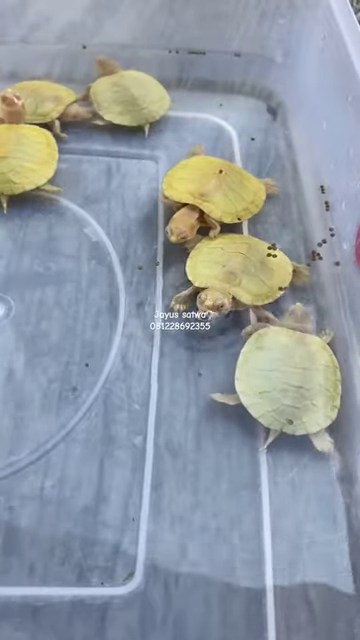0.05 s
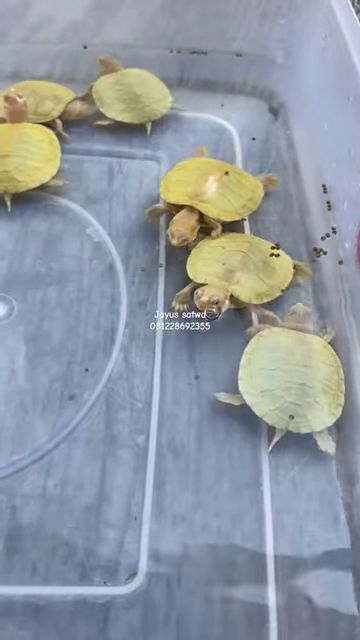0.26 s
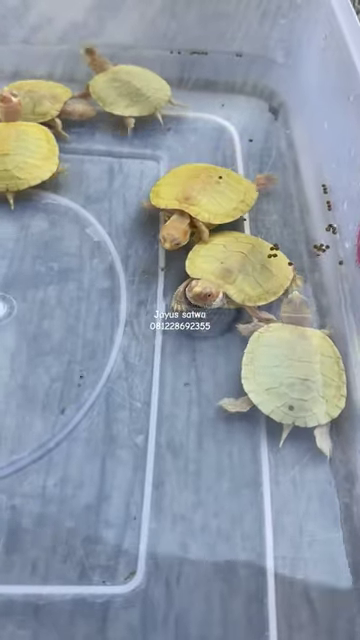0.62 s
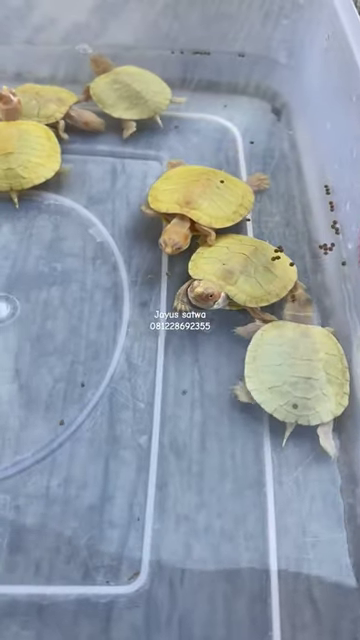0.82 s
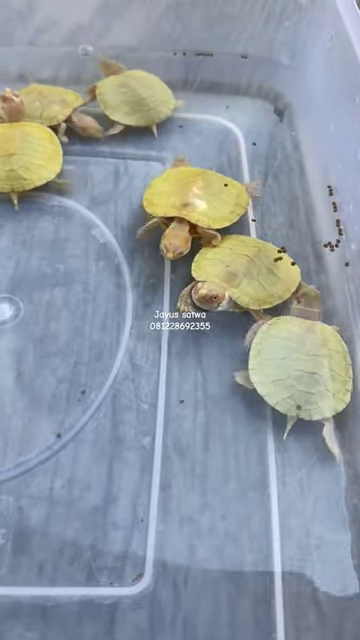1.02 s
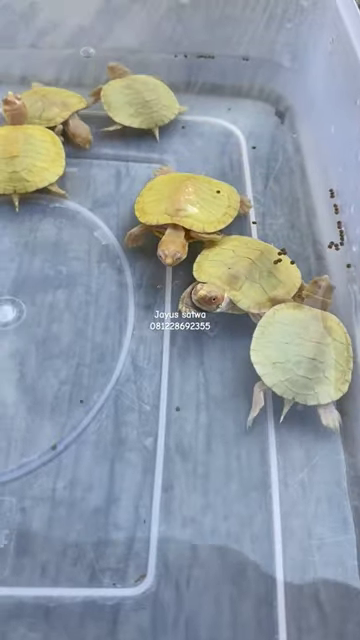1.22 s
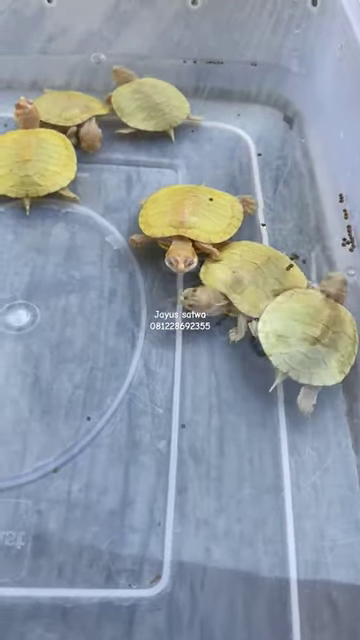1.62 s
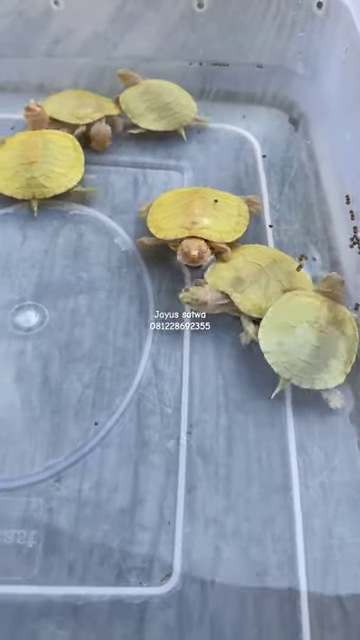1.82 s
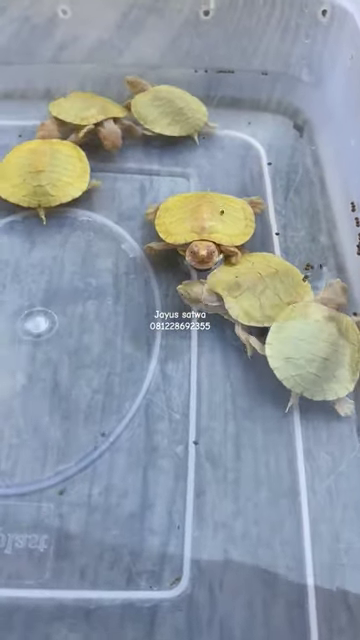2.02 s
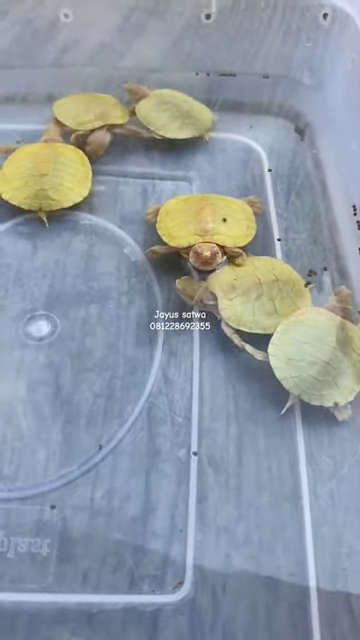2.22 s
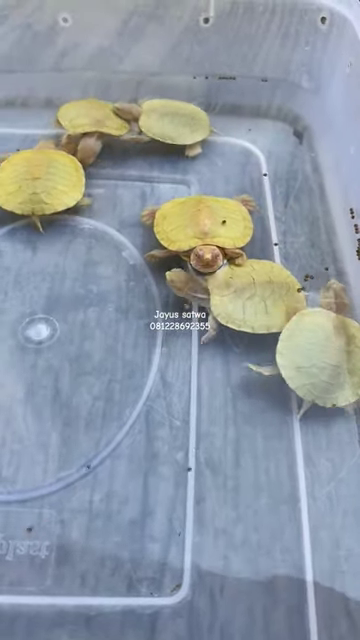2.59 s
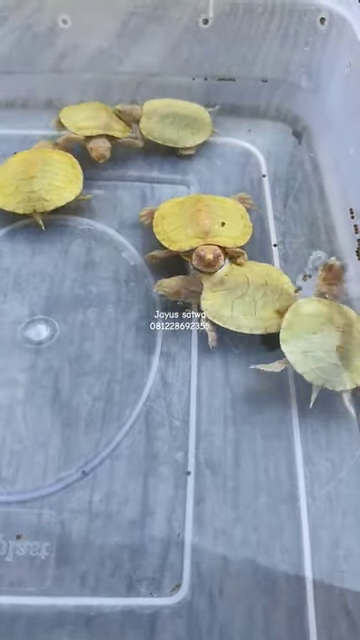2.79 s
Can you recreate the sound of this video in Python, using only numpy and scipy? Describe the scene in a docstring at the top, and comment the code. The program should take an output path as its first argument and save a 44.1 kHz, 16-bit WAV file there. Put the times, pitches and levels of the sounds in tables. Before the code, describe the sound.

In a hard-walled yard, a nearby small bird squawks twice, each call turning from clear to rough. Faint distant chirps and soft knocks fill a gap before it chatters and whistles, with low rumble and hiss behind.

```python
"""A small parrot-like bird calls nearby in a hard-walled yard: two squawks that start as clear
harmonic tones and break into a rasp, then two quick runs of chatter and whistles. Its voice is a
vibrating membrane coloured by throat and beak; roughness shakes the tone and lets air through.
The walls ring after each call. Behind it are a tiny tick, a far bird and soft knocks,
over a low distant rumble, wandering drones and a faint hiss."""
import sys
import numpy as np
from scipy import signal
from scipy.fft import rfft, irfft
from scipy.io import wavfile

SR = 44100
rng = np.random.default_rng(int(sys.argv[2]) if len(sys.argv) > 2 else 0)


def store_pcm(level_fs):
    """Save levels as 16-bit WAV."""
    pcm = np.round(np.clip(level_fs, -1, 1) * 32767).astype(np.int16)
    wavfile.write(sys.argv[1], SR, np.atleast_2d(pcm).T)


N = 130095
T = np.arange(N) / SR
TOP_HZ = 15900  # ceiling for the harmonics and the phone's treble

# Two squawks, one table each. Each row: time in seconds, pitch in Hz, level in dB,
# roughness from 0 (clear) to 1 (full rasp), lift of the fundamental in dB.
SQUAWK_GESTURES = [
    [(.219, 2400, -28, 0.54, 6), (.2215, 2411, -19, 0.21, 10.5), (.25, 2415, -20, 0.07, 3),
     (.268, 2461, -17.5, 0.14, -2.5), (.305, 2442, -21.5, 0.31, -5.5), (.325, 2492, -15.5, 0.16, -11),
     (.346, 2680, -21.5, 0.53, -6), (.356, 3080, -10, 0.53, -16.5), (.365, 3110, -23, 0.2, -41),
     (.372, 2930, -51, 1, -3)],
    [(.511, 2036, -57, 0, -6), (.515, 1966, -25.5, 0.13, 11), (.526, 2158, -21.5, 0.48, 9.5),
     (.55, 2307, -21.5, 0.26, -8), (.573, 2324, -15, 0.06, -6.5), (.589, 2470, -19, 0.31, -14),
     (.599, 2554, -19, 0.6, 0), (.614, 2644, -21.5, 0.88, -17), (.636, 2740, -25, 1.08, -15),
     (.665, 2988, -22, 1.14, -1), (.688, 2780, -51, 1, -17)],
]
# Beak and throat colour of a squawk. Each row: frequency in Hz, relative gain in dB.
SQUAWK_COLOUR = [(1400, -48.5), (1950, -4), (2450, -3.5), (3100, -2.5), (3800, 11), (4200, 10.5),
                 (5000, -6), (6200, -2), (7300, -7.5), (9500, -23), (11800, -11.5), (15000, -21.5)]


def squawks():
    """Two rising calls in which the membrane goes from a clear tone to a rasp."""
    return undb(-2) * sing(SQUAWK_GESTURES, SQUAWK_COLOUR, rasp=0.0936, air_db=-14.5)


# Chatter, one table a note. Each row: time in seconds, pitch in Hz, level in dB, roughness 0 to 1.
CHATTER_NOTES = [
    [(2.127, 4260, -53.5, 0.88), (2.135, 3626, -28, 0.16), (2.141, 3102, -21.5, 0.42),
     (2.150, 3730, -20.5, 0.31), (2.158, 3720, -40, 0.2)],
    [(2.151, 2410, -31.5, 0.5), (2.158, 2580, -28, 0.06), (2.175, 2559, -33.5, 0.5),
     (2.187, 2830, -25.5, 0.28), (2.208, 2629, -32, 0.2), (2.228, 2535, -40.5, 1.03), (2.243, 2481, -23, 0),
     (2.258, 2810, -47, 0.4)],
    [(2.196, 4440, -33, 0.1), (2.2, 4140, -16, 0.04), (2.211, 4560, -29.5, 0.54), (2.22, 4410, -23, .5)],
    [(2.241, 3450, -53, 0.04), (2.247, 3816, -23, 0.42), (2.262, 3950, -24.5, 0.33),
     (2.273, 3528, -24.5, 0.39), (2.286, 4006, -26.5, 0.4), (2.298, 3890, -29, 0.33),
     (2.307, 4100, -35, .5)],
    [(2.446, 2633, -34.5, 0.4), (2.457, 2639, -36.5, 0.47), (2.465, 2150, -33, 0.23),
     (2.478, 2432, -35, 0.56), (2.503, 2340, -49, 0), (2.525, 2413, -34, 0.46)],
    [(2.491, 3293, -57, .4), (2.497, 3775, -23, 0.42), (2.504, 4097, -30, 0.88), (2.513, 3900, -47, 0.8)],
    [(2.522, 4326, -36, 0.1), (2.527, 4256, -28.5, 0), (2.538, 3967, -23, 0.1), (2.543, 4120, -28, 0.4)],
    [(2.624, 4507, -33.5, 0.42), (2.633, 3953, -29, 0.25), (2.636, 3667, -37.5, 0),
     (2.647, 3383, -25.5, 0.31), (2.662, 4184, -37.5, 0.12), (2.676, 4260, -39, 0.2)],
]
# Beak and throat colour of chatter and whistles. Each row: frequency in Hz, relative gain in dB.
CHATTER_COLOUR = [(1750, -46), (2200, 0.5), (2750, -2.5), (3300, 8), (4200, 2), (5300, -7), (6500, -7),
                  (7800, -8), (9700, -29.5), (11200, -8), (12500, -24.5), (15000, -29.5)]
CHATTER_RASP = 0.099


def chatter():
    """Two runs of short, breathy, overlapping notes with darting pitch."""
    return undb(0.5) * sing(CHATTER_NOTES, CHATTER_COLOUR, CHATTER_RASP, air_db=0)


# Two thin whistles, one table each. Each row: time in seconds, pitch in Hz, level in dB.
WHISTLE_LINES = [
    [(2.474, 3500, -48), (2.48, 3290, -22), (2.51, 3262, -25.5), (2.545, 3234, -69), (2.6, 3252, -33),
     (2.625, 3310, -50), (2.633, 3340, -51)],
    [(2.69, 3405, -52), (2.74, 3500, -48.5), (2.79, 3560, -55.5), (2.832, 3580, -60), (2.845, 3660, -79)],
]


def whistles(roughness=0.07):
    """Nearly pure tones from a membrane that swings almost evenly."""
    notes = [[(*row, roughness) for row in line] for line in WHISTLE_LINES]
    return undb(-1.5) * sing(notes, CHATTER_COLOUR, CHATTER_RASP, air_db=0)


def bird(beak_cut_hz=1760):
    """The whole voice leaves through a small beak, which radiates almost no lows."""
    beak = signal.butter(8, beak_cut_hz, "high", fs=SR, output="sos")
    return signal.sosfilt(beak, squawks() + chatter() + whistles())


def sing(notes, throat, rasp, air_db):
    """Glide the syrinx through each note's pitch, level, roughness and, if given, fundamental lift."""
    out = np.zeros(N)
    for note in notes:
        times, *columns = np.array(note).T
        on = (T >= times[0]) & (T <= times[-1])
        hz, db, rough, *lift = [np.interp(T[on], times, column) for column in columns]
        lift_db = lift[0] if lift else 0
        out[on] += undb(db) * syrinx(hz, np.clip(rough, 0, 1), lift_db, throat, rasp, air_db)
    return out


RASP_HZ = 880  # how fast the pitch shakes
FLUTTER_DB, FLUTTER_HZ = 7.5, 500  # largest level swing at full roughness, and its speed
SHIMMER_DB, SHIMMER_HZ = 4, 70  # each harmonic trembles on its own


def syrinx(hz, rough, lift_db, throat, rasp, air_db):
    """A membrane's harmonics, shaped by the throat; roughness shakes pitch and level and leaks air."""
    n = len(hz)
    shaken_hz = hz * (1 + rasp * rough * walk(RASP_HZ, n))  # rasp: scatter as a fraction of the pitch
    phase = 2 * np.pi * np.cumsum(shaken_hz) / SR
    orders = np.arange(1, 8)[:, None]
    gains = undb(at_hz(orders * hz, throat) + lift_db * (orders == 1)) * (orders * hz < TOP_HZ)
    shimmer = undb(SHIMMER_DB * np.tanh(walk(SHIMMER_HZ, gains.size)).reshape(gains.shape))
    tone = np.sum(gains * shimmer * np.sin(orders * phase), axis=0)
    tone /= np.sqrt(np.sum(gains ** 2, axis=0) / 2)
    puffs = rng.standard_normal(N)[:n] * (1 + np.cos(phase))  # one puff of air per cycle
    air = unit(shape(puffs, lambda f: undb(at_hz(f, throat))))
    flutter = undb(FLUTTER_DB * rough * np.tanh(walk(FLUTTER_HZ, n)))  # the membrane's swing is bounded
    return tone * flutter + undb(air_db) * rough ** 1.5 * air


def tick(start_s=0.2005, decay_s=0.001009, low_cut_hz=5500):
    """A tiny burst of bright noise just before the first squawk."""
    burst = rng.standard_normal(N) * (T >= start_s) * np.exp(-np.abs(T - start_s) / decay_s)
    low_cut = signal.butter(4, low_cut_hz, "high", fs=SR, output="sos")
    return undb(-36.5) * signal.sosfilt(low_cut, burst)


# Far chirps, one table each. Each row: time in seconds, pitch in Hz, level in dB, roughness 0 to 1.
FAR_NOTES = [
    [(.93, 3280, -57, 0.08), (.955, 3260, -60.5, 0.25), (.985, 3180, -96.5, 0)],
    [(1.165, 3050, -64, .3), (1.2, 3116, -57.5, 0.05), (1.245, 3150, -75.5, 0.15)],
    [(1.825, 1756, -60, 0.26), (1.845, 1912, -55.5, 0.3), (1.865, 1960, -81, .2)],
]
# Their muffled colour. Each row: frequency in Hz, relative gain in dB.
DISTANCE_COLOUR = [(1800, 12.5), (3300, -15.5), (6000, -42.5)]


def far_bird():
    """Three faint chirps from another bird, dulled by distance."""
    return sing(FAR_NOTES, DISTANCE_COLOUR, CHATTER_RASP, air_db=-38.5)


# Faint, soft knocks. Each row: start in seconds, pitch in Hz, level in dB.
KNOCK_HITS = [(0.423, 420, -47), (0.666, 358, -45.5), (.843, 778, -50.5), (1.639, 338, -47),
              (1.91, 323, -50), (1.938, 545, -49.5), (2.75, 794, -60), (2.924, 329, -51)]


def knocks(attack_s=0.0024, decay_s=0.017):
    """Dull little bumps, each a short burst in one low resonance."""
    out = np.zeros(N)
    for start, hz, db in KNOCK_HITS:
        age = np.maximum(T - start, 0)
        envelope = 2 * (1 - np.exp(-age / attack_s)) * np.exp(-age / decay_s)
        out += undb(db) * envelope * wavering_sine(hz, spread=0.071, rate_hz=206)
    return out


# The ring of the walls. Each row: band centre in Hz, seconds to fade by 60 dB.
WALL_DECAY = [(2000, 0.44), (3300, 0.72), (5500, 0.64), (8000, .51), (14000, 0.41)]
EARLY_DB, EARLY_T60_S, FIRST_ECHO_S = -2.5, 0.0833, 0.0049
TAIL_DB, TAIL_BUILD_S = -4.5, 0.0053
LEFT_LAG_S, PAN_DB = 0.000187, 0.74  # the left microphone hears it later and slightly louder


def yard(x):
    """Direct sound, quick reflections from near surfaces, and a tail that rings longest near 3 kHz."""
    t = T[:SR]
    fade = lambda t60: np.exp(-np.log(1000) * t / t60)
    unit_energy = lambda h: h / np.sqrt(np.sum(h ** 2, axis=1, keepdims=True))
    early = unit_energy(rng.standard_normal((2, SR)) * fade(EARLY_T60_S) * (t > FIRST_ECHO_S))
    noise = rng.standard_normal((2, SR))
    tail = np.zeros((2, SR))
    for centre, t60 in WALL_DECAY:
        band = [(hz, hz == centre) for hz, _ in WALL_DECAY]  # 1 at this centre, 0 at the others
        tail += shape(noise, lambda f: at_hz(f, band)) * fade(t60)
    tail = unit_energy(tail * (1 - np.exp(-t / TAIL_BUILD_S)))
    walls = undb(EARLY_DB) * early + undb(TAIL_DB) * tail
    reverb = signal.fftconvolve(x[None], walls, axes=1)[:, :N]
    left = shape(x, lambda f: np.exp(-2j * np.pi * f * LEFT_LAG_S))
    pan = undb(np.array([[PAN_DB], [-PAN_DB]]) / 2)
    return (np.array([left, x]) + reverb) * pan


# Colour of the background bed. Each row: frequency in Hz, relative level in dB.
BED_COLOUR = [(20, -80), (40, 0), (65, -2), (130, 2), (190, -6), (260, -7.5), (335, -8), (450, -13.5),
              (650, -16.5), (800, -15.5), (1000, -21.5), (3000, -24), (7700, -30.5), (12000, -35.5),
              (16000, -37.5)]
# Its stereo image. Each row: frequency in Hz, left-right correlation from 0 (wide) to 1 (mono).
BED_CORRELATION = [(50, 1), (130, 0.81), (260, 0.56), (500, 0), (2000, 0.13), (15000, 0.19)]
MURK_HZ, MURK_DB = 420, 1.05  # centre and depth of the waver in the low mids


def rumble_and_hiss():
    """A noise bed: distant rumble in the centre, wide hiss, and slowly wavering low mids."""
    mid, side = (shape(rng.standard_normal(N), lambda f: undb(at_hz(f, BED_COLOUR))) for _ in range(2))
    likeness = lambda f: np.minimum(at_hz(f, BED_CORRELATION), 0.99)
    side = shape(unit(side), lambda f: np.sqrt((1 - likeness(f)) / (1 + likeness(f))))
    bed = undb(-52) * (unit(mid) + side * np.array([[1], [-1]]))
    murk = shape(bed, lambda f: np.exp(-np.log((f + 1) / MURK_HZ) ** 2))
    return bed + murk * (undb(MURK_DB * walk(rate_hz=2.33)) - 1)


# Distant drones. Each row: pitch in Hz, then a fader curve of (time in seconds, level in dB) points.
DRONE_SWELLS = [(78, [(0, -58), (1.8, -54), (2.05, -49.5), (2.42, -49), (2.7, -58), (2.95, -58)]),
                (130, [(0, -52), (.65, -60), (.98, -49.5), (1.3, -58), (1.65, -55), (2.1, -69),
                (2.95, -65.5)]), (185, [(0, -65.5), (1.2, -64), (1.5, -53.5), (1.7, -63.5), (2.95, -70.5)]),
                (795, [(0, -73), (.8, -70), (1.05, -69.5), (1.4, -69.5), (1.6, -72), (2.95, -72)])]


def drones():
    """Faint tones that swell and wander like far traffic."""
    out = np.zeros(N)
    for hz, curve in DRONE_SWELLS:
        tone = unit(wavering_sine(hz, spread=0.0298, rate_hz=14.4))
        level_db = np.interp(T, *np.array(curve).T) + 1.33 * walk(rate_hz=24)
        out += tone * undb(level_db)
    return out


def undb(db):
    """Decibels to gain."""
    return 10 ** (np.asarray(db) / 20)


def unit(x):
    """Scale to rms 1."""
    return x / np.sqrt(np.mean(x ** 2) + 1e-20)


def at_hz(hz, points):
    """Read a table on a log-frequency axis."""
    freqs, values = np.array(points, float).T
    return np.interp(np.log(np.maximum(hz, 1)), np.log(freqs), values)


def shape(x, gain):
    """Filter by a gain that is a function of frequency."""
    n = x.shape[-1]
    return irfft(rfft(x) * gain(np.arange(n // 2 + 1) * SR / n), n)


def walk(rate_hz, size=N):
    """Smooth random modulation with spread 1, moving at up to about the given rate."""
    return unit(shape(rng.standard_normal(N), lambda f: 1 / (1 + (f / rate_hz) ** 4)))[:size]


def wavering_sine(hz, spread, rate_hz):
    """A sine that drifts at random; spread is a fraction of its pitch."""
    return np.sin(2 * np.pi * np.cumsum(hz * (1 + spread * walk(rate_hz))) / SR)


def scene():
    """The birds and small noises ring in the yard, over the background."""
    return yard(bird() + far_bird() + knocks() + tick()) + rumble_and_hiss() + drones()


def record(dry):
    """The phone cuts the top of the treble."""
    return signal.sosfilt(signal.ellip(8, .2, 80, TOP_HZ, fs=SR, output="sos"), dry)


dry = scene()
out = record(dry)
store_pcm(out)
```